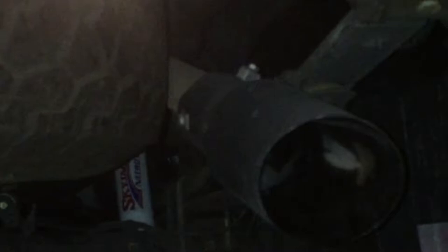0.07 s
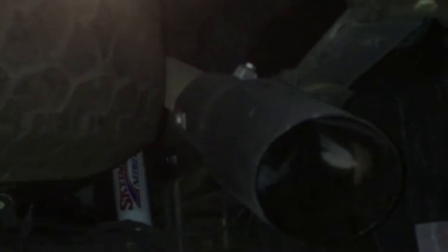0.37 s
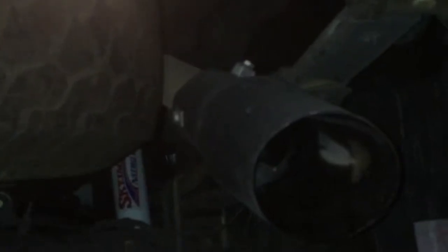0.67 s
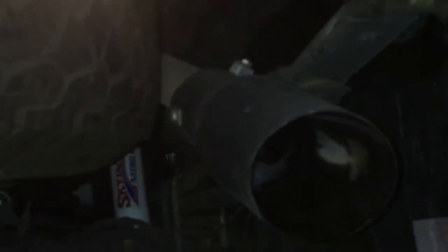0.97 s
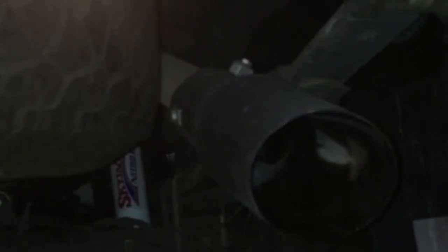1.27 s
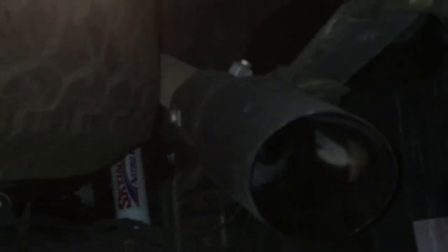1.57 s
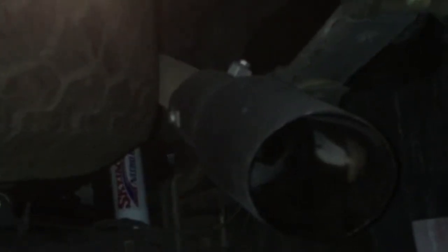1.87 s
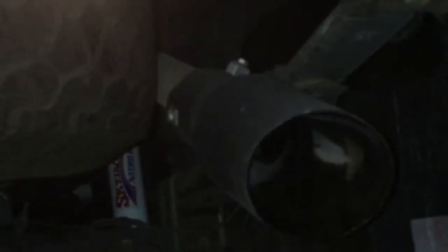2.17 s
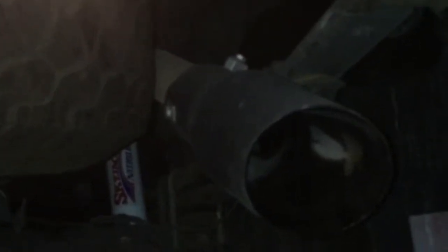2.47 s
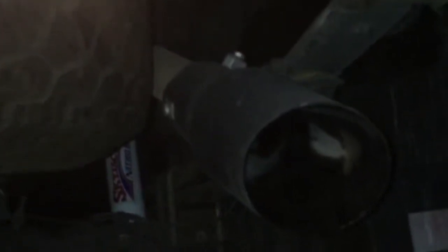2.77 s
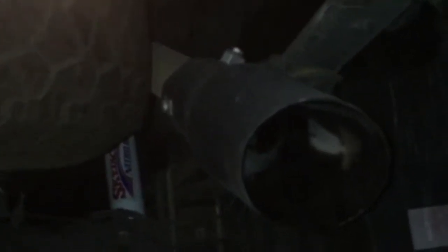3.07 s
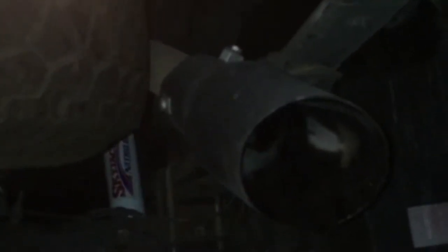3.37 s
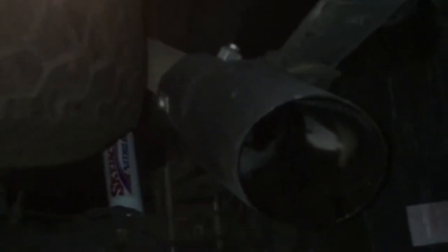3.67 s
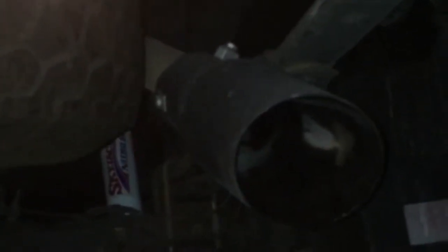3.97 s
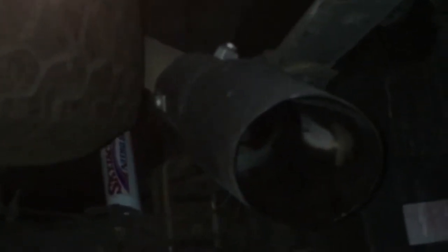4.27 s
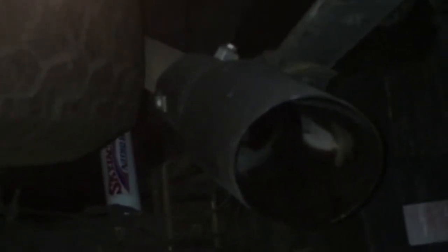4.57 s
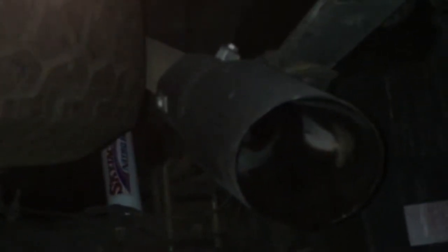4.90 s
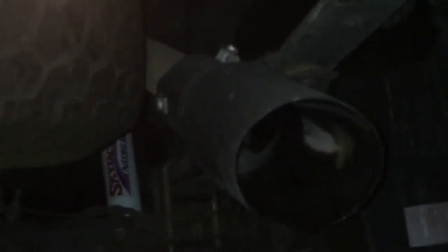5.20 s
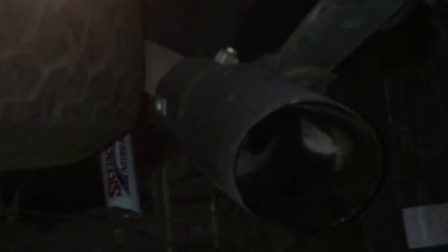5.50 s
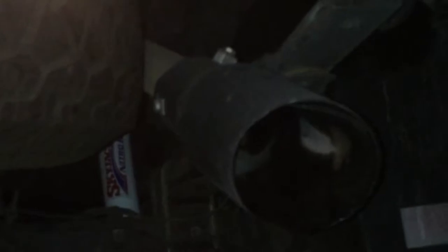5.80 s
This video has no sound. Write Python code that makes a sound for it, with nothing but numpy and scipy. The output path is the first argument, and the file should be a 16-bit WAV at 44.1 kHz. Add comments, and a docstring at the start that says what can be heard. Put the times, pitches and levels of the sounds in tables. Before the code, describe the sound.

The low boom of a pickup truck's muffler comes in almost at once and throbs steadily at idle, with the microphone right by the exhaust opening. Quieter gas noise and short, regular spits of hiss ride on the rapid puffs. Around the middle the engine speeds up a touch, with a faint crackle, then settles. Shortly before the end, one sharp click marks a tiny skip, and the idling carries on.

```python
"""Pickup truck idling, heard at the tailpipe

Four exhaust puffs per engine cycle boom in the muffler and ring the pipe. Gas rushes and crackles from
the opening, and once a cycle a sharp hiss spits, as from a small leak. The idle swells gently once.
The sound fades in quickly and skips once, with a click, near the end."""
import sys
import numpy as np
from scipy import signal
from scipy.fft import rfft, irfft, next_fast_len
from scipy.io import wavfile
from scipy.ndimage import map_coordinates

SR = 44100
rng = np.random.default_rng(int(sys.argv[2]) if len(sys.argv) > 2 else 0)


def store_pcm(level_fs):
    """Save levels as 16-bit WAV."""
    pcm = np.round(np.clip(level_fs, -1, 1) * 32767).astype(np.int16)
    wavfile.write(sys.argv[1], SR, np.atleast_2d(pcm).T)


N = 257544
PADDED = N + SR // 10  # spare samples for the skip
TIME = np.arange(PADDED) / SR
IDLE_RPM, SWELL_CREST_S = 784.82, 3.45

# Table levels are relative. A position of 0 to 1 spans one engine cycle.
# knocks on the muffler's shell: position/cycle, level/dB
SHELL_KNOCKS = [(.28, 15.5), (0.779, 12.5)]
# tones the shell rings at: f/Hz, width/Hz, level/dB
SHELL_TONES = [(210, 7.9, -1), (235.3, 5.8, 4)]
# tone colour of the small pops: f/Hz, level/dB
POP_SPECTRUM = [(120, -35.5), (300, -7.5), (700, -2.5), (1200, -6), (1800, -9.5), (3000, -21), (8000, -48)]
# sharp pressure jumps that strike the pipe: position/cycle, level/dB
PRESSURE_JUMPS = [(0.031, -1), (.2, -8.5), (0.28, -5.5), (.44, -4.5), (0.549, 2.5), (.61, 3.5), (0.781, -2),
                  (.935, -1.5)]
# low tones of the pipe: f/Hz, width/Hz, level/dB
PIPE_LOW_TONES = [(367, 7, 0), (412, 10.6, 4), (407, 13, -28), (484.6, 8.9, 6.5), (498.7, 15.6, 4),
                  (500, 20, -36), (766, 18, -23)]
# high tones of the pipe, standing out of the gas noise: f/Hz, width/Hz, lift/dB (scaled by ring)
PIPE_HIGH_TONES = [(800, 22, 8.5), (1004, 49, 6), (1222, 29, 7), (1382, 22, 9.5), (1508, 130, 4.5),
                   (1684, 30, 6), (2030, 61, 7.5), (2124, 70, 5), (2360, 39, 6), (2470, 45, 8),
                   (2710, 47, 6), (2770, 40, 5.5), (2860, 20, 12), (3286, 230, 6.5), (3586, 220, 5),
                   (4280, 47, 7.5), (5020, 26, -12), (5080, 20, 8), (5300, 28, -1), (6185, 86, 8),
                   (7030, 570, 3.5), (7350, 360, 5), (7760, 230, 5), (9070, 140, 1.5), (10380, 110, 4.5),
                   (11200, 220, 1.5)]
# spits of the leak: peak position/cycle, level/dB, rise/s, hold/s
LEAK_SPITS = [(.35, -14, .005, .010), (0.507, 0.5, 0.0067, 0.0091), (0.762, -3, 0.022, 0.0068)]
# tone colour of the leak's hiss: f/Hz, level/dB
LEAK_SPECTRUM = [(500, -28), (1200, -3), (2400, 1), (3600, -6), (4500, 3.5), (5600, 1.5), (7400, -2.5),
                 (9000, 0.5), (12000, -3.5), (14300, -8)]
# tone colour of the gas leaving the pipe: f/Hz, level/dB
RUSH_SPECTRUM = [(20, 2), (100, 13.5), (200, 3.5), (290, -2.5), (480, -3.5), (700, -5.5), (1200, -6),
                 (1700, -4.5), (2300, -3.5), (3100, -11), (5000, -11.5), (7500, -20.5), (11000, -22.5),
                 (14300, -30.5)]
# exhaust puffs in firing order: position/cycle, level/dB
EXHAUST_PUFFS = [(0, -2.5), (1 / 4, -0.0078), (1 / 2, 0), (3 / 4, 0.028)]
# the muffler's answer to one puff: f/Hz, level/dB
MUFFLER_SPECTRUM = [(8, -65), (26, -25.5), (52, -10), (79, -7), (98, .3), (105, 0), (131, -15),
                    (157, -25.5), (185, -42), (300, -62), (1000, -105)]


def amp(db):
    """Turn decibels into a gain."""
    return 10 ** (np.asarray(db) / 20)


def unit(x):
    """Scale to an average (rms) level of 1."""
    return x / np.sqrt(np.mean(x ** 2) + 1e-20)


def level_at(spectrum, hz):
    """Read a spectrum's level in dB between its points, on a log frequency axis."""
    freqs, levels = np.transpose(spectrum)
    return np.interp(np.log(hz + 1), np.log(freqs + 1), levels)


def wobble(rate):
    """A smooth curve through `rate` random points a second."""
    return map_coordinates(rng.standard_normal(int(TIME[-1] * rate) + 4), [TIME * rate])


def filtered(x, response):
    """Shape each frequency in x by response(hz)."""
    size = 2 * next_fast_len(PADDED // 2 + SR // 4)
    hz = np.fft.rfftfreq(size, 1 / SR)
    return irfft(rfft(x, size) * response(hz), size)[..., :x.shape[-1]]


def causal(gain):
    """A filter with this gain that rings only after the blow (minimum phase)."""
    cepstrum = irfft(np.log(gain))
    half = len(cepstrum) // 2
    cepstrum[1:half] *= 2
    cepstrum[half + 1:] = 0
    return np.exp(rfft(cepstrum))


def resonate(x, tones):
    """Let x ring a set of tones; narrower ones ring longer."""
    return filtered(x, lambda hz: sum(
        amp(db) * 1j * hz * width / (centre ** 2 - hz ** 2 + 1j * hz * width)
        for centre, width, db in tones))


def pulses(cycle, pattern, scatter_db, jitter_s):
    """Taps that repeat a pattern every cycle, each a little off in size and time."""
    position, db = np.transpose(pattern)
    due = np.arange(int(cycle[-1]) + 1)[:, None] + position
    time_error, size_error = rng.standard_normal((2,) + due.shape)
    times = np.interp(due, cycle, TIME) + jitter_s * time_error
    samples = np.clip(times * SR, 0, PADDED).astype(int)
    sizes = amp(db + scatter_db * size_error)
    return np.bincount(samples.ravel(), sizes.ravel(), PADDED + 1)[:PADDED]


def engine_cycle(start=-.016, swell_rpm=8.58, rise_s=.8, fall_s=.45):
    """Count engine cycles, two crank turns each, as the idle speeds up once and settles."""
    since = TIME - SWELL_CREST_S
    rpm = IDLE_RPM + swell_rpm * np.exp(np.minimum(since / rise_s, -since / fall_s))
    return start + np.cumsum(rpm) / (2 * 60 * SR)


def underbody_echoes(x, echo_db=-12, decay_s=.092):
    """Add the many short echoes between the ground and the truck's underside."""
    t = TIME[:SR // 10]
    tail = rng.standard_normal(len(t)) * amp(-60 * t / decay_s) * (t > .003)
    return x + amp(echo_db) * signal.fftconvolve(x, tail / np.linalg.norm(tail))[:PADDED]


def gas_noise(spectrum, ring):
    """Swirling gas makes noise; ring sets how far the pipe's high tones stand out."""
    def colour(hz):
        lift_db = sum(db / (1 + (2 * (hz - centre) / width) ** 2)
                      for centre, width, db in PIPE_HIGH_TONES)
        return amp(level_at(spectrum, hz) + ring * lift_db)
    noise = filtered(rng.standard_normal(PADDED), colour)
    return unit(underbody_echoes(noise))


def shell_thump(cycle):
    """Every second puff gives the muffler's shell a dull, uneven knock."""
    knocks = pulses(cycle, SHELL_KNOCKS, scatter_db=3, jitter_s=.00052)
    return amp(-49.5) * unit(resonate(knocks, SHELL_TONES))


def sputter(pops_per_s=300, spread_db=2.5, slope_db_per_s=4):
    """Small random pops crackle in the outflow, loudest when the engine runs fastest."""
    pops = (rng.random(PADDED) < pops_per_s / SR) * rng.choice([-1, 1], PADDED)
    pops = pops * amp(spread_db * rng.standard_normal(PADDED))
    crackle = filtered(pops, lambda hz: causal(amp(level_at(POP_SPECTRUM, hz))))
    return amp(-43 - slope_db_per_s * abs(TIME - SWELL_CREST_S)) * unit(crackle)


def pipe_ring(cycle):
    """Pressure jumps ring the pipe's low tones: a hollow patter."""
    jumps = pulses(cycle, PRESSURE_JUMPS, scatter_db=2.2, jitter_s=.00023)
    return amp(-42.5) * unit(resonate(jumps, PIPE_LOW_TONES))


def leak_hiss(cycle, fall_db_per_s=396):
    """Once a cycle a sharp hiss spits out, with a faint one before it and a softer one a puff later."""
    cycle_s = 2 * 60 / IDLE_RPM
    power = amp(-39) ** 2  # a faint seep between spits
    for position, db, rise_s, hold_s in LEAK_SPITS:
        since_peak = ((cycle - position) * cycle_s + rise_s) % cycle_s - rise_s
        opening = np.clip(1 + since_peak / rise_s, 0, 1)
        fall_db = fall_db_per_s * np.maximum(since_peak - hold_s, 0)
        power = power + (opening * amp(db - fall_db)) ** 2
    level_db = -38.5 + .6 * wobble(8) + 1.4 * wobble(300)  # slow drift, fast flutter
    return amp(level_db) * np.sqrt(power) * gas_noise(LEAK_SPECTRUM, ring=1.22)


def gas_rush(cycle, surge_db=.56, flutter_db=.24, drift_db=.5):
    """The outflow surges slightly with each puff and flutters as it swirls."""
    surge = -np.cos(2 * np.pi * (len(EXHAUST_PUFFS) * cycle - .2))
    level_db = surge_db * surge + flutter_db * wobble(260) + drift_db * wobble(2.8)
    return amp(-34) * unit(amp(level_db) * gas_noise(RUSH_SPECTRUM, ring=.65))


def muffler_boom(cycle):
    """Each puff sets the muffler swinging a few times: the deep, throbbing drone."""
    puffs = pulses(cycle, EXHAUST_PUFFS, scatter_db=.45, jitter_s=.00008)
    drone = filtered(puffs, lambda hz: causal(amp(level_at(MUFFLER_SPECTRUM, hz))))
    return amp(-15.5) * unit(drone)


def skip(exhaust, at_s=5.4233, jump_s=.0228, click_decay_s=.00045):
    """The sound skips a moment ahead, with a sharp click at the jump."""
    since = TIME[:N] - at_s
    after = since > 0
    kept = np.arange(N) + round(jump_s * SR) * after
    click = amp(-12.5) * after * np.exp(-abs(since) / click_decay_s)
    return exhaust[kept] - click


def scene():
    """Add up the exhaust sounds in one channel; the engine cycle sets their rhythm."""
    cycle = engine_cycle()
    exhaust = muffler_boom(cycle) + shell_thump(cycle) + pipe_ring(cycle)
    exhaust += gas_rush(cycle) + sputter() + leak_hiss(cycle)
    return skip(exhaust)[None]


def record(dry, start_s=.1215, first_gain=.18, fade_s=.072, top_hz=14350):
    """After a short silence the sound fades in quickly; the highest treble is cut off."""
    since = TIME[:N] - start_s
    fade = (since > 0) * np.clip(first_gain + since / fade_s * (1 - first_gain), 0, 1)
    return filtered(dry * fade, lambda hz: hz < top_hz)


dry = scene()
out = record(dry)
store_pcm(out)
```